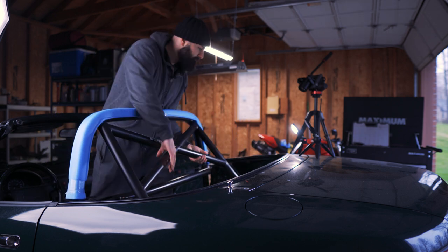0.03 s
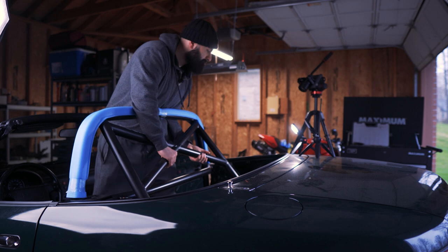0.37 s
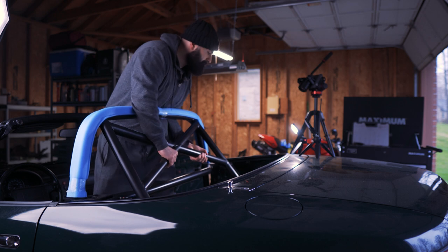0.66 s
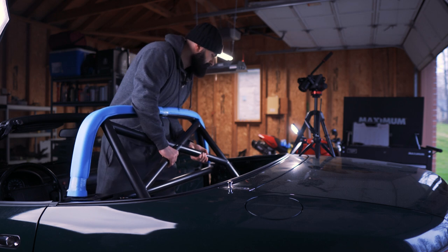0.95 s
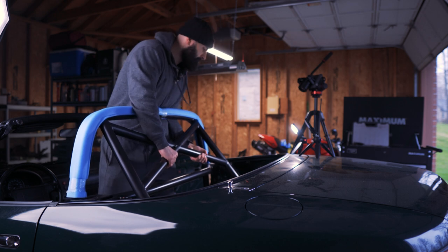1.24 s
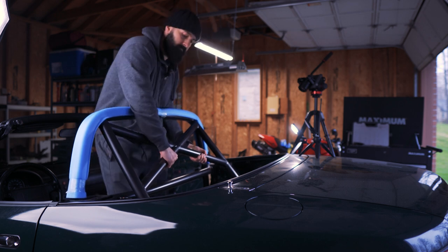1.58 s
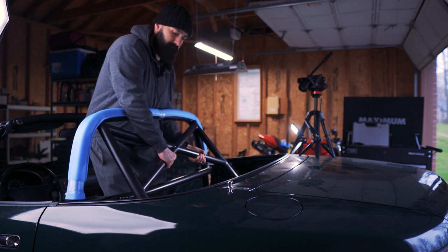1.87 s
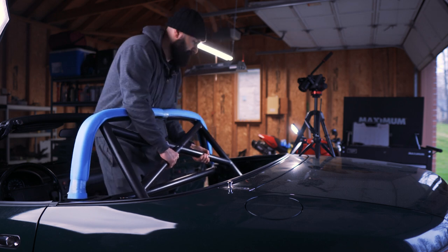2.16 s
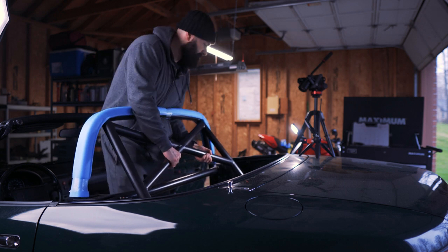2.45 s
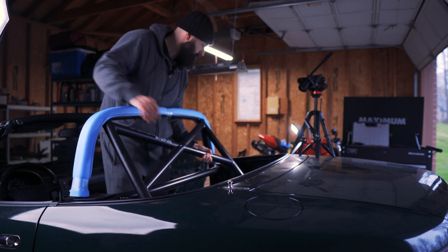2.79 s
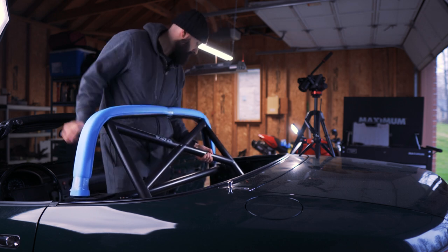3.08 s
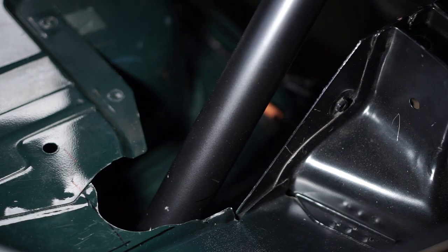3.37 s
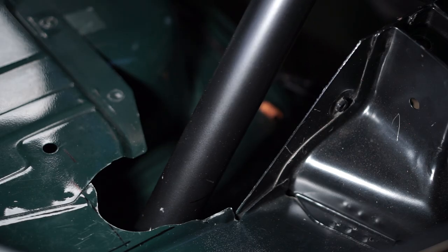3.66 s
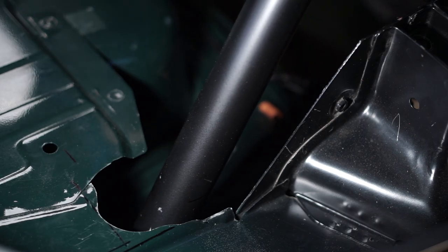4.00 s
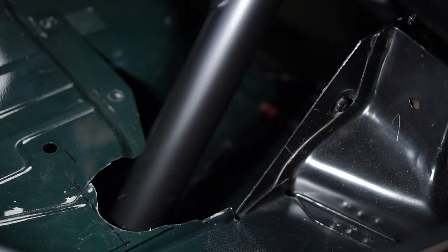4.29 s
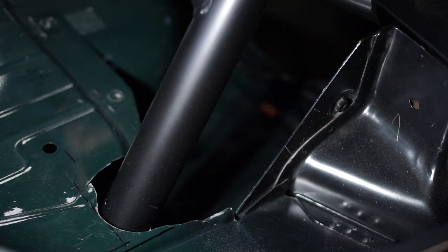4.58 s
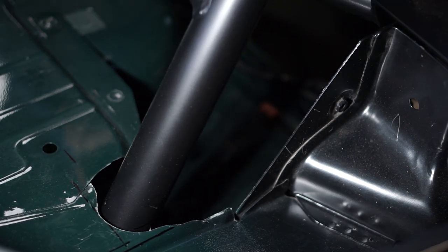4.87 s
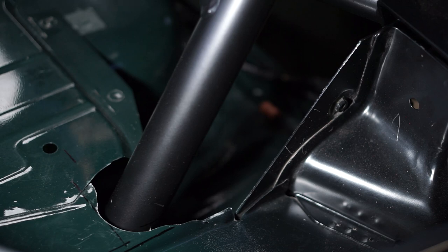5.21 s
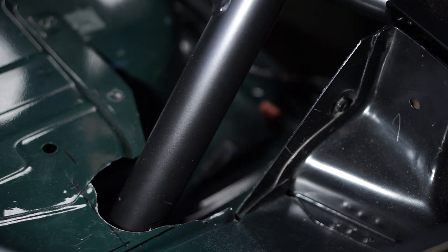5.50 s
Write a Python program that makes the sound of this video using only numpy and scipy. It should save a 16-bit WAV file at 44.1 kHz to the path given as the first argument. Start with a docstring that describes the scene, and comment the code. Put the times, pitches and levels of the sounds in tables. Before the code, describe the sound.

Over steady garage room noise, a jacket rustles, a steel tube scrapes briefly on an edge and small contacts tick. The roll bar then knocks several times on a car's sheet-metal deck, which rings and booms. After a short lull and faint squeaks, its foot drops into the wheel well with a louder clatter. The ringing fades under light rustles and squeaks. The sound is in stereo, with slight room echo.

```python
"""A steel roll bar is lowered into a bare car body in a garage. First, over steady room noise, a jacket
rustles, the tube scrapes an edge and small contacts tick. From 1.6 s its legs knock on the rear deck:
each blow rings the sheet metal and booms the body shell, and the steel sings on. Faint squeaks begin
at 3.3 s. From 3.8 s the bar's foot drops through a cut-out and clatters in the wheel well. Last, the
ringing fades under a few more rustles and squeaks."""
import sys
import numpy as np
from scipy import signal
from scipy.fft import rfft, irfft
from scipy.io import wavfile

SR = 44100
rng = np.random.default_rng(int(sys.argv[2]) if len(sys.argv) > 2 else 0)


def output_pcm(signal):
    """Save a mono or channel-first signal as 16-bit PCM at the path in sys.argv[1].

    Samples are clipped to [-1, 1] before scaling.
    """
    pcm = np.clip(np.atleast_2d(signal).T, -1, 1) * 32767
    wavfile.write(sys.argv[1], SR, np.round(pcm).astype(np.int16))


N = 244300
T = np.arange(N) / SR
TAIL = T[:65536]  # time for one sound to ring out


def undb(db):
    """Turn decibels into a factor to multiply by."""
    return 10 ** (np.asarray(db) / 20)


def unit(x):
    """Scale a sound to an average power of 1."""
    return x / np.sqrt(np.mean(x ** 2))


def fade(ring_s):
    """A fade that falls 60 dB in ring_s seconds, the ring time."""
    return np.exp(-np.log(1000) * TAIL / ring_s)


def at_hz(points, hz):
    """Read between (Hz, value) points, spacing octaves evenly."""
    point_hz, value = np.transpose(points)
    return np.interp(np.log(np.maximum(hz, 1)), np.log(point_hz), value)


def bins(size):
    """The frequencies in the spectrum of size samples."""
    return np.fft.rfftfreq(size, 1 / SR)


def add(track, s, sound):
    """Mix a sound in at s seconds."""
    start = int(s * SR)
    track[..., start:start + sound.shape[-1]] += sound[..., :N - start]


def wander(rate):
    """Random drift that finds a new value rate times a second."""
    return np.interp(T * rate, np.arange(N), rng.standard_normal(N))


def through(force, response):
    """Play a force through something that rings, in stereo."""
    return signal.fftconvolve(force[None], response, axes=1)[:, :N]


def pulse(colour, size=4096):
    """A click whose colour (its bass and treble) follows (Hz, dB) points."""
    cepstrum = irfft(np.log(undb(at_hz(colour, bins(size)))))
    # pack the energy at the start of the click
    cepstrum[1:size // 2] *= 2
    cepstrum[size // 2 + 1:] = 0
    return irfft(np.exp(rfft(cepstrum)))


# Stereo width. Each row: frequency in Hz, level in dB of what differs between the ears against the rest.
STEREO_WIDTH = [(50, -45), (125, -24), (250, -19.5), (500, -11.5), (1000, -7), (2000, -6), (4000, -1.5),
                (12000, -1)]

def stereo_noise(colour, size, grain_db=0):
    """Coloured noise, alike in both ears in the bass; grain makes it crackle."""
    mid, side = rfft(rng.standard_normal((2, size)) * undb(grain_db * rng.standard_normal(size)))
    side = side * undb(at_hz(STEREO_WIDTH, bins(size)))
    ears = np.array([mid + side, mid - side])
    return unit(irfft(ears * undb(at_hz(colour, bins(size))), size))


# Colour of the room noise. Each row: frequency in Hz, level in dB.
ROOM_COLOUR = [(15, -46), (25, -21), (55, 0), (157, -7.5), (180, -14), (301, -12.5), (373, -15), (476, -13),
               (575, -13), (641, -12), (1290, -15), (1400, -14.5), (1560, -16), (1940, -17), (16000, -46.5)]
# Its loudness. Each row: time in seconds, level in dB.
ROOM_LEVELS = [(0, -42.5), (1.2, -43), (2.1, -42.5), (3.2, -45), (3.5, -40), (4.1, -40.5), (4.9, -43.5),
               (5.54, -44.5)]

def room_noise():
    """The steady noise of the open garage, drifting a little in level."""
    level = undb(np.interp(T, *np.transpose(ROOM_LEVELS)))
    return stereo_noise(ROOM_COLOUR, N) * level * undb(0.13 * wander(17))


def strokes(rows, grip_db_per_s=280, press_db_per_s=8.5, release_db_per_s=96):
    """Each rub swells as it takes hold, creeps up as pressure builds, then dies away."""
    power = np.zeros(N)
    for s, length_s, db in rows:
        grip = grip_db_per_s * np.maximum(s - T, 0)
        press = press_db_per_s * np.clip(T - s, 0, length_s)
        release = release_db_per_s * np.maximum(T - s - length_s, 0)
        power += undb(db - grip + press - release) ** 2
    return np.sqrt(power)


# Colour of the rubbing. Each row: frequency in Hz, level in dB.
RUB_COLOUR = [(300, -1.5), (1000, -2), (2500, -1), (5000, -9), (9000, -8.5), (15500, -11.5)]
# Rubs of jacket and tube. Each row: start in seconds, length in seconds, starting level in dB.
RUB_STROKES = [(0, 0.041, -43.5), (.1, 0.069, -44), (.26, 0.46, -56.5), (1.35, 0.15, -47),
               (1.62, 0.052, -43), (1.79, 0.097, -45.5), (2.22, 0.15, -49.5), (2.59, 0.049, -50),
               (2.7, 0.031, -43.5), (3.325, 0.9, -48.5), (4.16, 0.077, -30.5), (4.39, 0.011, -34.5),
               (4.83, 0.046, -51.5), (4.935, 0.043, -48.5), (5.08, 0.087, -55.5), (5.33, 0.17, -57.5)]

def rustle():
    """The jacket and the sliding tube rub in fine, uneven grains."""
    return stereo_noise(RUB_COLOUR, N, grain_db=4) * strokes(RUB_STROKES) * undb(wander(60))


def ring(notes):
    """An object's own notes fade after a tap; higher ones reach the two ears out of step."""
    out = 0
    for hz, db, ring_s in notes:
        skew = np.arctan(undb(at_hz(STEREO_WIDTH, hz))) * rng.choice([-1, 1]) * np.array([[1], [-1]])
        out = out + undb(db) * np.sin(2 * np.pi * hz * TAIL + skew) * fade(ring_s)
    return out


# Notes of the scraped edge. Each row: pitch in Hz, level in dB, ring time in seconds.
EDGE_NOTES = [(1940, -11, 0.031), (2084, -7, 0.055), (2400, -6, 0.063), (2690, 2, 0.014), (3300, 8, 0.003),
              (4070, -10, .008)]
# Drags over it. Each row: start in seconds, length in seconds, starting level in dB.
TUBE_DRAGS = [(.115, .005, -43), (1.275, 0.02, -53), (1.315, 0.024, -39.5), (1.43, 0.022, -45.5)]

def scrape():
    """The tube sticks and slips, and each slip briefly rings the edge."""
    slips = rng.standard_normal(N) ** 3
    return unit(through(slips, ring(EDGE_NOTES))) * strokes(TUBE_DRAGS)


# How long the blur of notes lasts. Each row: frequency in Hz, ring time in seconds.
WASH_RING_TIMES = [(100, 0.63), (500, 0.62), (1500, 0.63), (4000, 0.63), (8000, 0.29), (15000, 0.11)]

def wash(colour, bands=14):
    """Countless overlapping notes blur into noise whose treble dies first."""
    spectrum, hz = rfft(stereo_noise(colour, len(TAIL))), bins(len(TAIL))
    centres = np.geomspace(WASH_RING_TIMES[0][0], WASH_RING_TIMES[-1][0], bands)
    out = 0
    for centre, share in zip(centres, np.eye(bands)):
        band = irfft(spectrum * at_hz(np.column_stack([centres, share]), hz))
        out = out + band * fade(at_hz(WASH_RING_TIMES, centre))
    return out


def garage(sound, echo_db, fade_s):
    """Add the echo of the garage walls: a wash shortened by an extra fade."""
    echo = wash([(500, -1), (7000, 1.5), (15000, -2.5)]) * fade(fade_s)
    response = echo * undb(echo_db) / np.sqrt(SR / 1000)
    response[:, 0] += 1  # the sound itself
    return through(sound, response)


# Small contacts. Each row: time in seconds, then relative levels in dB of the treble and the 4 kHz body.
CONTACT_TICKS = [(0.332, -30, -38.5), (0.4474, -29.5, -37.5), (0.568, -25.5, -31), (0.5844, -30, -38),
                 (0.88, -31, -39), (0.8993, -24.5, -34), (1.3867, -24.5, -35), (1.404, -30, -45),
                 (1.4256, -16.5, -27.5), (1.7974, -24.5, -24.5), (1.924, -22, -39), (2.36, -25.5, -47),
                 (2.5985, -27.5, -59), (2.7733, -24.5, -39), (4.0268, -24, -73), (4.2205, -16, -25),
                 (4.523, -31, -40)]

def ticks(click_s=0.0014, catch_s=0.0049, catch_db=-2):
    """Tiny double clicks: a contact catches lightly just before it snaps free."""
    clicks, t = np.zeros(N), T[:SR // 50]
    for s, treble_db, body_db in CONTACT_TICKS:
        catch, snap = rng.standard_normal((2, len(t))) * np.exp(-t / click_s)
        body, top = body_db + 8, treble_db - 6
        click = pulse([(800, body - 22), (2200, body - 7), (4000, body), (8500, top), (14000, top - 3)])
        add(clicks, s - catch_s, undb(catch_db) * signal.fftconvolve(catch, click))
        add(clicks, s, signal.fftconvolve(snap, click))
    return garage(clicks, echo_db=-15, fade_s=0.99)


def blows(knocks, skid_db, skid_hz, push_hz):
    """Each blow is one rounded push, then a short swell of chatter as steel skids over steel."""
    force, t = np.zeros(N), T[:SR // 4]
    highpass = signal.butter(2, skid_hz, "high", fs=SR, output="sos")
    push = signal.lfilter(*signal.butter(1, push_hz, fs=SR), signal.unit_impulse(len(t)))
    for s, db, boom_db, thump_db, bright_db, skid_s, favoured_hz, boost_db in knocks:
        chatter = signal.sosfilt(highpass, rng.standard_normal(len(t)) ** 3)
        skid = chatter * np.sqrt(t) * np.exp(-t / skid_s)
        contact = push + undb(skid_db) * skid / np.linalg.norm(skid)
        # the spot where it lands favours one range of notes
        favoured = signal.lfilter(*signal.iirpeak(favoured_hz, Q=13, fs=SR), contact)
        contact = contact + (undb(boost_db) - 1) * favoured
        # a flat blow thumps, a corner blow is bright
        hardness = pulse([(25, boom_db - 23), (60, boom_db), (85, boom_db), (130, thump_db),
                          (260, thump_db), (550, 0), (1100, 0), (5000, bright_db)])
        add(force, s, undb(db) * signal.fftconvolve(contact, hardness))
    return force


# Deep notes of the whole car body. Each row: pitch in Hz, relative level in dB, ring time in seconds.
SHELL_NOTES = [(39.2, -9, 0.88), (68, -2, 0.33), (74.7, -18, 1.75), (93, -16.5, 1.46), (111.7, -12, 0.89),
               (127.6, -7.5, 0.28), (154.2, -12, 0.41), (216.1, -4.5, 0.55), (230.8, -2.5, 0.15),
               (262.3, -3, 0.46)]

def panel(force, notes, colour, notes_db, shell_db, wash_db, crack_db, crowd_hz, travel_s):
    """A struck panel: the first crack, its own notes, the shell's boom and a wash of higher notes."""
    # low notes stand apart; only higher up do they crowd into a wash
    crowd = signal.sosfilt(signal.butter(2, crowd_hz, "high", fs=SR, output="sos"), wash(colour))
    response = undb(notes_db) * ring(notes) + undb(shell_db) * ring(SHELL_NOTES) + undb(wash_db) * crowd
    crack = pulse(colour)
    crack = crack / np.abs(crack).max()
    # bending metal carries treble faster than bass, which smears the crack
    lag_cycles = travel_s * np.sqrt(bins(len(crack)) * SR / 2)
    crack = irfft(rfft(crack) * np.exp(-2j * np.pi * lag_cycles))
    response[:, :len(crack)] += undb(crack_db) * crack
    return through(force, response)


# Blows on the deck. Each row: start in seconds, level in dB, then boom, thump and brightness in dB,
# skid time in seconds, favoured pitch in Hz, its boost in dB.
DECK_BLOWS = [(1.598, -41.5, 9, -12, 8, 0.0035, 334, 17), (1.613, -31.5, 4.5, -9.5, 9.5, 0.0016, 730, 8.5),
              (1.621, -33.5, -4, -9, -7, 0.0078, 654, 13), (1.735, -41, -19, -11, 9, 0.023, 700, 4),
              (1.848, -39, 1, 0, 6.5, 0.0063, 602, 13.5), (1.869, -38, 10.5, 8.5, -26, 0.0033, 154, 13),
              (1.93, -50.5, 21, -11, -5, 0.0028, 150, 1), (2.177, -38.5, -13, -10.5, 3, 0.0055, 408, 0),
              (2.208, -42, -3, 1, 15.5, 0.01, 2760, 10), (2.256, -32, -1, 0.5, 5.5, 0.004, 136, 15.5),
              (2.277, -20, -17, 0, 1.5, 0.003, 1220, 7), (2.285, -27, -1, -0.5, -3, 0.0032, 210, 15),
              (2.302, -28.5, 2, 6, -11, 0.008, 261.5, 13.5), (2.348, -26, -8, -0.5, 2.5, 0.016, 487, 10.5),
              (2.372, -29.5, 12, 10.5, -10, 0.0073, 254, 5), (2.402, -31.5, 6, 0, -15, 0.024, 122, 14.5),
              (2.463, -39.5, 6, -2, -5, 0.0041, 608, 21), (2.5, -40.5, 3.5, -1, -5, 0.0039, 65.3, 25)]
# The deck's own notes. Each row: pitch in Hz, relative level in dB, ring time in seconds.
DECK_NOTES = [(335, -3, 0.38), (370, -4.5, 0.31), (413, -6, 0.38), (443, -9, 0.48), (525, 1, 0.27),
              (612, -25, 0.45), (670, -20, 0.55), (785, -9, 0.49), (847, -10, 0.58), (1083, 0, 0.095),
              (1340, -14, 0.29), (1380, -18, 0.34), (1490, -22, 0.35), (1917, -16, 0.93), (2820, -16, 0.25),
              (3040, -25, .3), (3510, -30, .4), (4270, -39, .4)]
# Colour of its crack and wash. Each row: frequency in Hz, level in dB.
DECK_WASH = [(53, -24), (90, -4), (172, -5.5), (260, -4), (316, -12), (467, -6), (647, -13), (1100, -19.5),
             (1440, -18), (1640, -22.5), (2150, -25), (3000, -28), (6300, -37.5), (9510, -50), (11600, -72),
             (16000, -95)]

def rear_deck():
    """The bar's legs knock on the sheet metal of the rear deck."""
    force = blows(DECK_BLOWS, skid_db=-1.5, skid_hz=875, push_hz=1640)
    return panel(force, DECK_NOTES, DECK_WASH, notes_db=-4, shell_db=1.5, wash_db=3.5,
                 crack_db=17, crowd_hz=156, travel_s=0.000759)


# Lingering notes. Each row: start in seconds, pitch in Hz, level in dB, swell and ring times in seconds.
STEEL_NOTES = [(1.613, 765, -26, .003, .17), (1.618, 604.5, -22.5, 0.0043, 0.32),
               (1.615, 6270, -39, 0.0047, .2), (2.178, 409, -31.5, 0.0045, 0.57),
               (2.353, 11750, -43, 0.004, 0.13), (2.355, 11850, -50, .005, 0.36),
               (2.355, 7600, -51, .005, 0.55), (4.072, 6270, -35.5, 0.015, 0.15),
               (4.175, 741, -11.5, 0.0071, .3), (4.378, 1498, -16.5, 0.0035, 0.26),
               (4.386, 1915, -24, 0.0041, 0.49), (4.393, 255.7, -13, 0.0036, 0.21),
               (4.44, 823, -21.5, .01, 0.42), (4.44, 480.5, -32, 0.013, 0.95),
               (4.72, 468, -36.5, 0.04, 0.76), (4.77, 291.5, -33, 0.16, 1.25),
               (5.243, 485, -31, 0.021, 0.16), (5.29, 521, -37.5, 0.027, 0.38)]

def singing_steel(flutter_db=2, waver=0.004):
    """After a knock or touch the steel sings on at one note, a little unsteady in level and pitch."""
    out = np.zeros(N)
    for s, hz, db, swell_s, ring_s in STEEL_NOTES:
        pitch = hz * (1 + waver * wander(182)[:len(TAIL)])
        note = np.sin(2 * np.pi * np.cumsum(pitch) / SR)
        swell = 1 - np.exp(-TAIL / swell_s)
        add(out, s, undb(db) * note * swell * fade(ring_s))
    return out * undb(flutter_db * wander(80))


# Faint squeaks. Each row: start and length in seconds, first and last pitch in Hz, level in dB.
SQUEAK_GLIDES = [(3.33, .1, 12000, 12850, -62), (3.5, .13, 13650, 13200, -58),
                 (5.14, 0.21, 11150, 10900, -62), (5.16, 0.13, 8700, 8300, -66),
                 (5.156, 0.145, 7700, 7280, -68), (5.278, 0.16, 7740, 8600, -68)]

def squeaks(waver=0.008, flutter_db=3):
    """Thin, rough squeaks that slide in pitch."""
    out, drift = np.zeros(N), wander(500)
    for s, length_s, first_hz, last_hz, db in SQUEAK_GLIDES:
        start, size = int(s * SR), int(length_s * SR)
        pitch = np.linspace(first_hz, last_hz, size) * (1 + waver * drift[start:start + size])
        add(out, s, undb(db) * np.hanning(size) * np.sin(2 * np.pi * np.cumsum(pitch) / SR))
    return garage(out * undb(flutter_db * wander(120)), echo_db=-13, fade_s=0.5)


# Blows in the wheel well. Each row reads like a row of DECK_BLOWS.
WELL_BLOWS = [(3.783, -38, -7, 3, 10.5, 0.0064, 2550, 8.7), (3.798, -34, -13, 2, -6, 0.0027, 229, 11),
              (4.145, -37.5, -26, 10.5, -12, 0.0092, 141, 5), (4.156, -29.5, -11, 8, 6, 0.0095, 154, 17.5),
              (4.174, -18.5, -11, 2.5, 0.5, 0.0037, 225, 8.4),
              (4.191, -24, -1, 4.5, -9, 0.0038, 1040, 16.3), (4.197, -25, 5, -5, -0.5, 0.002, 4120, 15),
              (4.229, -28, 1, 11, -11, 0.015, 1090, 12), (4.258, -29, 14, 12, -1, 0.011, 155.5, 16),
              (4.305, -29, 23.5, 10.5, -23, 0.0093, 155, 3.1), (4.312, -30, 10.5, 10, 7, 0.014, 71.8, 16.2),
              (4.366, -21.5, -16, 5.5, -0.5, 0.011, 515, 16.6),
              (4.382, -21.5, -13, 0, 7.5, 0.006, 1614, 13), (4.396, -25.5, -7, 3.5, 2, 0.0092, 231, 20),
              (4.413, -19.5, -21, -2, 8, 0.0028, 2540, 6.3), (4.443, -20, 0.5, -17, 0, 0.0064, 513, 15),
              (4.487, -21.5, 5, -5.5, -2.5, 0.021, 533, 5), (4.545, -31, 6, 5, 0, 0.013, 513, 2.6),
              (4.645, -42, 19.5, 8.5, -16, 0.015, 493, 3.1)]
# The well's own notes. Each row: pitch in Hz, relative level in dB, ring time in seconds.
WELL_NOTES = [(347, -14, 0.4), (402, 5, 0.25), (470, -14, 0.82), (503, -14, 0.94), (558, -4, 0.26),
              (689, -19, 0.67), (735.6, -0.5, 0.57), (837, 1.5, 0.58), (920, -14, 0.45), (983, -26, 0.22),
              (1066, -6, 0.36), (1174, -9.5, 0.4), (1250, -10, 0.49), (1346, -12, 0.45), (1500, -12, 0.67),
              (1614, -17, 1), (1730, -20, 0.45), (1940, -16, 0.42), (2010, -24, 0.4), (2430, -19, 0.6),
              (2530, -13, 0.28), (3280, -17, .5), (3770, -31, 0.18), (3950, -24, 0.23), (4600, -24, 0.5)]
# Colour of its crack and wash. Each row: frequency in Hz, level in dB.
WELL_WASH = [(53, -15), (90, 5.5), (229, -10), (360, -6), (488, -4), (640, -12), (753, -3.5), (1290, -17.5),
             (1540, -13.5), (2180, -19.5), (3290, -23.5), (13200, -40.5), (16000, -65)]

def wheel_well():
    """The bar's foot clatters against the sheet metal of the wheel well."""
    force = blows(WELL_BLOWS, skid_db=-1, skid_hz=1010, push_hz=1570)
    return panel(force, WELL_NOTES, WELL_WASH, notes_db=-8.5, shell_db=-6.5, wash_db=3.5,
                 crack_db=15, crowd_hz=166, travel_s=0.000995)


def scene(left_db=0.4, bass_hz=300):
    """All the sounds together; above the bass they lean slightly to the left."""
    sound = room_noise() + rustle() + scrape() + ticks()
    sound += rear_deck() + singing_steel() + squeaks() + wheel_well()
    bass = signal.lfilter(*signal.butter(1, bass_hz, fs=SR), sound)
    return bass + (sound - bass) * undb([[left_db], [-left_db]])


def record(dry, rumble_hz=24, top_hz=15850):
    """Drop the deepest rumble, round off the tallest peaks and cut the highest treble."""
    dry = signal.sosfilt(signal.butter(2, rumble_hz, "high", fs=SR, output="sos"), dry)
    rounded = dry / (1 + dry ** 6) ** (1 / 6)
    return signal.sosfilt(signal.ellip(10, .1, 70, top_hz, fs=SR, output="sos"), rounded)


dry = scene()
out = record(dry)
output_pcm(out)
```